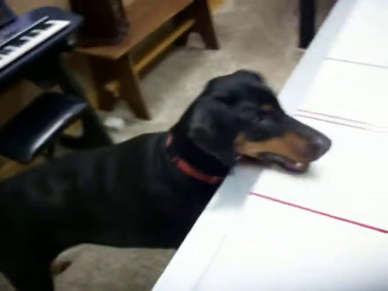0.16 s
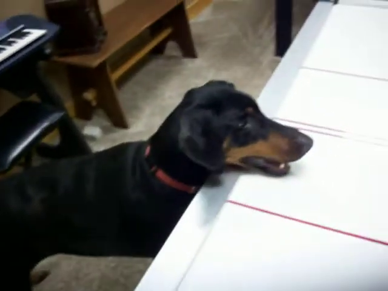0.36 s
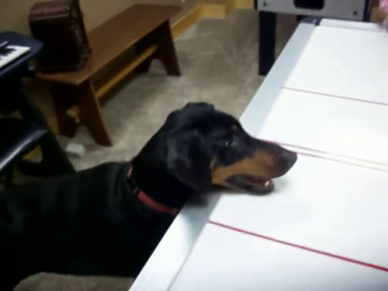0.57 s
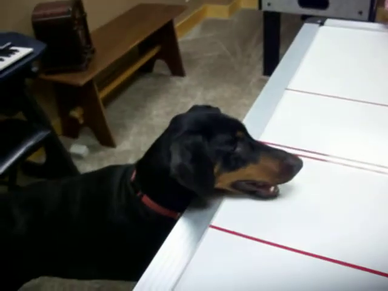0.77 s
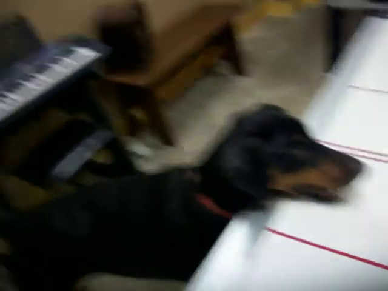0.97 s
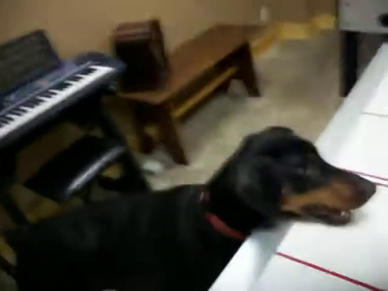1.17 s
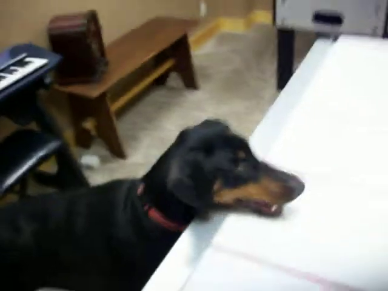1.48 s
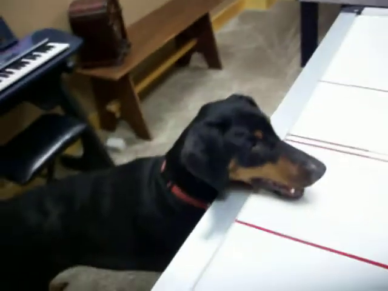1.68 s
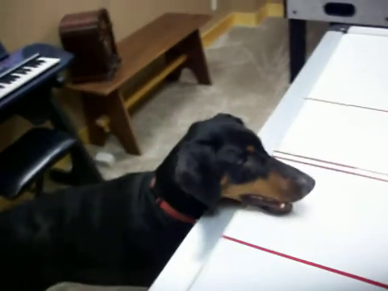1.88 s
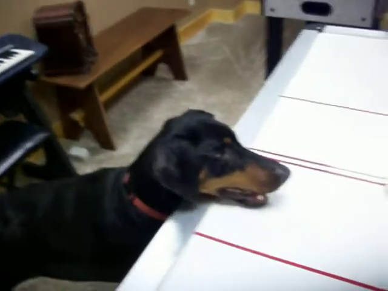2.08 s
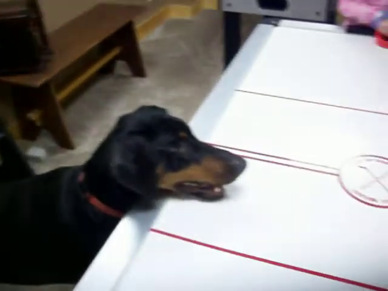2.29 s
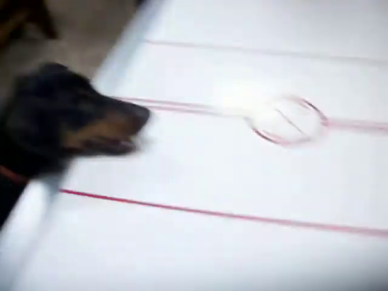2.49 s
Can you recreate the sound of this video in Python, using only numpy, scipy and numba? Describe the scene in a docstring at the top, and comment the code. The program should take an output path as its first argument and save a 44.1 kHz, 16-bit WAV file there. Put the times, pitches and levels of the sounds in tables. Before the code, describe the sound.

Over the steady hum and airy rush of a table fan, an air hockey puck makes several loud, hard plastic knocks, followed by a soft dull bump. The room adds a short echo, and the nearby microphone overloads slightly.

```python
"""An air hockey puck knocks against mallets and rails in a hard-walled room. Each impact is a short
crack that excites the damped modes of puck and table; wall reflections and reverberation follow.
Light taps and dull bumps join in, over the air noise and motor hum of the table's blower.
Loud knocks overload a small recorder for a few milliseconds; its gain drops and then creeps back,
so the echo seems to hang before it falls away."""
import sys
import numpy as np
from scipy import signal
from scipy.fft import rfft, irfft
from scipy.io import wavfile
from scipy.ndimage import uniform_filter1d
from numba import njit

SR = 44100
rng = np.random.default_rng(int(sys.argv[2]) if len(sys.argv) > 2 else 0)


def int16_out(signal):
    """Quantize to a 16-bit WAV file."""
    q = np.round(np.clip(np.atleast_2d(signal).T, -1, 1) * 32767)
    wavfile.write(sys.argv[1], SR, q.astype(np.int16))


N = 115983


def impact(crack_t60, main_hz, main_db):
    """Impulse excitation: a brief contact radiates a noise crack and sets damped modes ringing."""
    # Modes of puck and table. Each row: frequency in Hz, relative level in dB, T60 in seconds.
    mode_table = [(410, -5, 0.093), (682, -3, 0.072), (875, -1.5, 0.034), (1327, -8.5, 0.082),
                  (1660, -6, 0.019), (2027, 1, 0.055), (2380, 1.5, 0.033), (2936, -4, 0.057),
                  (3207, 7.5, .025), (3915, -4, 0.025), (4455, 3, .025), (4770, -2.5, 0.016)]
    modes_db, crack_db = 5.5, 10
    modes = 0
    for hz, db, t60 in mode_table:
        amplitude = undb(db + 2 * rng.standard_normal()) * rng.choice([-1, 1])
        modes += amplitude * ring(hz * (1 + 0.013 * rng.standard_normal()), t60)
    body = undb(modes_db) * modes / np.sqrt(len(mode_table)) + undb(main_db) * ring(main_hz, t60=0.021)
    crack = undb(crack_db) * rng.standard_normal(N) * fade(crack_t60)
    return (body + crack) * swell(seconds=.0012)


def knock(impact_db, crack_t60, main_hz, main_db, echo_s, plastic_db, *tint_db):
    """Superposition: direct sound, reflections, reverberation and ringing plastic add to one knock."""
    # Spectral envelope of all knocks. Each row: frequency in Hz, gain in dB.
    envelope = [(50, -40.5), (150, -24.5), (300, -7), (500, -5), (850, -0.5), (1500, -2.5), (2300, -2.5),
                (3200, -2.5), (3850, -4.5), (4500, -4), (5500, -10.5)]
    # Frequencies in Hz at which a knock's own tint is given.
    tint_hz = [300, 800, 1600, 3000, 4600]
    room_db, far_wall_db, far_wall_s = 5.5, -5.5, .053
    direct = undb(impact_db) * impact(crack_t60, main_hz, main_db)
    echoes = reflections(direct, echo_s)
    room = undb(room_db) * reverberation() + undb(far_wall_db) * place(reverberation(), far_wall_s)
    sound = colour(direct + echoes + room + .5 * plastic_ring(plastic_db), envelope)
    return colour(sound, list(zip(tint_hz, tint_db)))


def plastic_ring(level_db):
    """Light damping: two high resonances of the hard plastic outlast the crack."""
    # Each row: centre in Hz, bandwidth in Hz, relative level in dB, T60 in seconds.
    bands = [(3362, 360, 0.5, 0.31), (4356, 300, 2.5, 0.34)]
    return sum(undb(level_db + db) * resonance(hz, width) * fade(t60) for hz, width, db, t60 in bands)


def tap(hz, t60, ring_db):
    """Free vibration after a light touch: one decaying mode, with a tick and some reverberation."""
    # Spectral envelope of tick and reverberation. Each row: frequency in Hz, gain in dB.
    envelope = [(100, -14), (500, -7.5), (1000, 11), (2000, 7), (3200, -1), (5000, -11)]
    tick = rng.standard_normal(N) * fade(t60=0.018)
    return undb(ring_db) * ring(hz, t60) + colour(tick + 2 * reverberation(), envelope)


def bump(hz, width_hz, rise_s, t60):
    """Resonant response: a dull bump sets the table booming in one broad, low band."""
    return resonance(hz, width_hz) * swell(rise_s) * fade(t60)


def reflections(direct, first_s):
    """Specular reflection: a nearby surface and the walls return delayed, weaker copies."""
    near_s, near_db, first_db = .0042, -5, -8
    echoes_per_s, walls_db = 250, -17.5
    walls = (rng.random(N) < echoes_per_s / SR) * rng.choice([-1, 1], N) * fade(t60=0.3)
    early = undb(near_db) * place(direct, near_s) + undb(first_db) * place(direct, first_s)
    return early + undb(walls_db) * signal.fftconvolve(direct, walls)[:N]


def reverberation():
    """Diffuse field: dense echoes build quickly, then decay, slightly sooner in the treble."""
    # Each row: lower band edge in Hz, reverberation time T60 in seconds.
    bands = [(0, 0.28), (400, 0.26), (1200, 0.28), (2600, 0.27), (4000, 0.25)]
    spectrum = rfft(rng.standard_normal(N))
    f = np.arange(N // 2 + 1) * SR / N
    upper_edges = [hz for hz, _ in bands[1:]] + [SR]
    tail = sum(irfft(spectrum * ((f >= low) & (f < high)), N) * fade(t60)
               for (low, t60), high in zip(bands, upper_edges))
    return tail * swell(seconds=0.0036)


def blower():
    """Fan noise: a broadband rush of air plus motor tones that waver in level and phase."""
    # Spectrum of the air. Each row: frequency in Hz, relative spectral density in dB.
    air_spectrum = [(25, -35.5), (42, -18), (62, -15), (115, -15), (170, -6.5), (250, -6.5), (340, -7.5),
                    (500, -14), (850, -15.5), (1700, -18), (3000, -27), (4500, -32.5), (5500, -37),
                    (6200, -41.5)]
    # Motor tones. Each row: frequency in Hz, rms level in dB.
    tones = [(59.5, -51.5), (120, -58), (151, -48), (204.6, -48), (240.5, -36.5), (290.7, -43)]
    air_db, waver_db, drift_rad = -30.5, 1.5, 0.23
    t = np.arange(N) / SR
    air = colour(rng.standard_normal(N), air_spectrum)
    hum = 0
    for hz, db in tones:
        level = undb(db + waver_db * walk(rate_hz=13))
        phase = 2 * np.pi * (hz * t + rng.random()) + drift_rad * walk(rate_hz=6)
        hum += level * np.sin(phase)
    return undb(air_db) * unit(air) + np.sqrt(2) * hum


@njit
def gain_control(x):
    """Negative feedback: the gain, in dB, drops fast on peaks, overshoots by its lag and creeps back."""
    limit_db, attack_db_per_s, release_db_per_s = -7, 3296, 206
    detector_s, lag_s = 0.00089, .001
    peak_decay = np.exp(-1 / (detector_s * SR))
    gain_db = np.empty(len(x))
    target_db, db, peak = 0., 0., 0.
    for i in range(len(x)):
        peak = max(abs(x[i]) * 10 ** (db / 20), peak * peak_decay)
        if peak > 10 ** (limit_db / 20):
            target_db -= attack_db_per_s / SR
        else:
            target_db = min(target_db + release_db_per_s / SR, 0.)
        db += (target_db - db) / (lag_s * SR)
        gain_db[i] = db
    return gain_db


def ring(hz, t60):
    """Damped harmonic oscillator: one struck mode."""
    return np.sin(2 * np.pi * hz * np.arange(N) / SR) * fade(t60)


def resonance(hz, width_hz):
    """Noise-driven resonance: a bell-shaped band of rms 1."""
    f = np.arange(N // 2 + 1) * SR / N
    return unit(irfft(rfft(rng.standard_normal(N)) / (1 + (2 * (f - hz) / width_hz) ** 2), N))


def colour(x, points):
    """Minimum-phase filter through (Hz, dB) points on a log-frequency axis."""
    size = 2 * N
    hz, db = np.array(points, float).T
    f = np.maximum(np.arange(N + 1) * SR / size, 1)
    gain = undb(np.interp(np.log(f), np.log(hz), db))
    cepstrum = irfft(np.log(gain), size)
    cepstrum[1:N] *= 2  # folding onto positive time makes the filter causal
    cepstrum[N + 1:] = 0
    return irfft(rfft(x, size) * np.exp(rfft(cepstrum)), size)[:N]


def fade(t60):
    """Exponential decay, 60 dB down after t60 seconds."""
    return np.exp(-np.log(1000) * np.arange(N) / SR / t60)


def swell(seconds):
    """First-order rise from silence with the given time constant."""
    return 1 - np.exp(-np.arange(N) / SR / seconds)


def walk(rate_hz):
    """Low-pass fluctuation: random steps smoothed twice, at rms 1."""
    hold = int(SR / rate_hz)
    steps = rng.standard_normal(256)[np.arange(N) // hold % 256]
    return unit(uniform_filter1d(uniform_filter1d(steps, hold), hold))


def place(x, start_s):
    """Time shift; a negative start cuts off the onset."""
    shift = int(round(start_s * SR))
    delay, skip = max(shift, 0), max(-shift, 0)
    return np.pad(x, (delay, skip))[skip:][:N]


def undb(db):
    """Decibels to amplitude ratio."""
    return 10 ** (np.asarray(db) / 20)


def unit(x):
    """Normalisation to rms 1."""
    return x / np.sqrt(np.mean(x ** 2))


def scene():
    """Linear superposition of knocks, taps, bumps and the blower in one channel."""
    # Hard knocks. Each row: start in seconds, relative level in dB, impact gain in dB, crack T60 in
    # seconds, main mode in Hz, its gain in dB, first wall echo delay in seconds, plastic ring gain
    # in dB, then five tint gains in dB from low to high frequency.
    knock_events = [(-.062, 3, 10.5, 0.034, 1420, 11.5, .02, -8.5, -4.5, 2.3, 2.5, -2.5, -0.5),
                    (0.4056, 1, 2.5, 0.016, 2937, 0.5, 0.025, -26, -2, 2.7, 5.5, 6, -2),
                    (1.0024, -6, 4, 0.028, 3190, 3.5, .033, -2.5, 9, -0.11, 5, 5, 0),
                    (1.1882, 7.5, 2, 0.013, 1714, 2, 0.034, -8.5, -6, -1, 3.5, 1, 1.5),
                    (1.5433, 1.5, 0.5, 0.076, 1465, -8.5, 0.029, -12, -2.5, 3, 3, -1.5, -0.5),
                    (2.0190, 0, 2.5, 0.03, 2938, 5, 0.015, -29, -8, 4.3, 5, 5.5, 0)]
    # Light touches. Each row: start in seconds, gain in dB, mode in Hz, T60 in seconds, mode gain in dB.
    tap_events = [(1.0345, -21, 3500, 0.046, 20.5), (1.9323, -27.5, 2150, 0.018, 11)]
    # Dull bumps. Each row: start in seconds, gain in dB, centre and width in Hz, rise and T60 in seconds.
    bump_events = [(.125, -17, 785, 900, 0.015, 0.16), (1.025, -11.5, 309, 110, 0.016, 0.26),
                   (2.535, -17, 520, 261, 0.0099, 0.16), (2.575, -23, 246, 90, 0.0059, .25)]
    knock_db = 3
    knocks = sum(place(undb(knock_db + db) * knock(*shape), start) for start, db, *shape in knock_events)
    taps = sum(place(undb(db) * tap(*shape), start) for start, db, *shape in tap_events)
    bumps = sum(place(undb(db) * bump(*shape), start) for start, db, *shape in bump_events)
    return (knocks + taps + bumps + blower())[None]


def record(dry):
    """Compression and saturation in a narrow-band recorder: gain control, soft overload, hard clipping."""
    band_hz, top_hz, soft_ceiling, hard_ceiling = 5492, 16200, 0.67, .72
    x = signal.sosfilt(signal.butter(6, 6500, fs=SR, output="sos"), dry[0])
    lead = SR // 20  # a mirrored lead-in, so the gain control is already acting at the start
    gain_db = gain_control(np.pad(x, (lead, 0), "reflect"))[lead:]
    x = soft_ceiling * np.tanh(x * undb(gain_db) / soft_ceiling)
    low_pass = signal.firwin(101, band_hz, window=("kaiser", 8), fs=SR)
    x = np.clip(np.convolve(x, low_pass, "same"), -hard_ceiling, hard_ceiling)
    return signal.sosfilt(signal.ellip(8, .2, 70, top_hz, fs=SR, output="sos"), x)[None]


dry = scene()
out = record(dry)
int16_out(out)
```